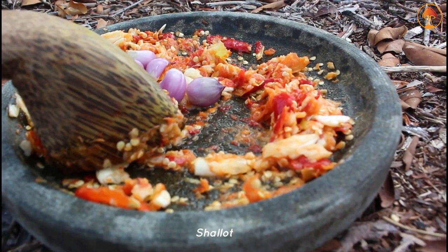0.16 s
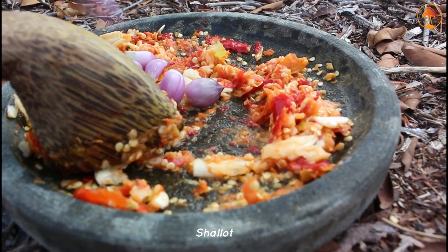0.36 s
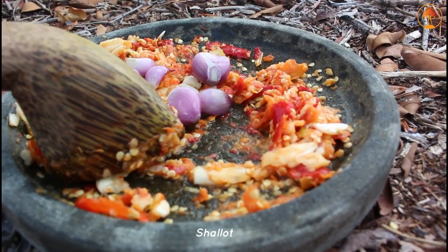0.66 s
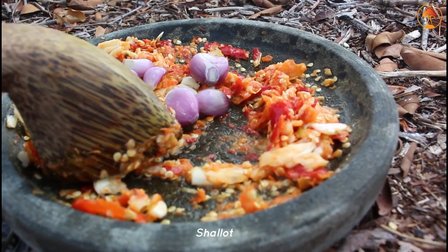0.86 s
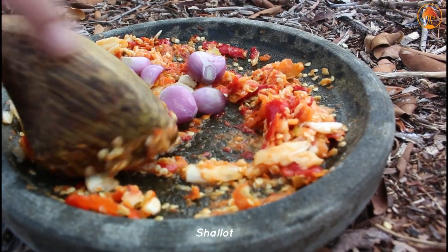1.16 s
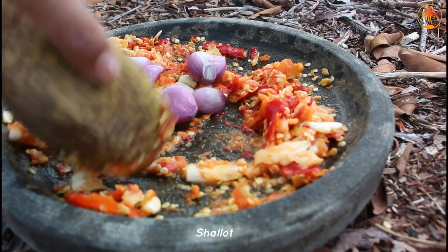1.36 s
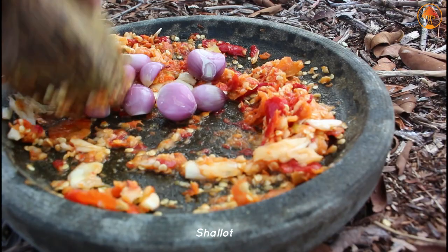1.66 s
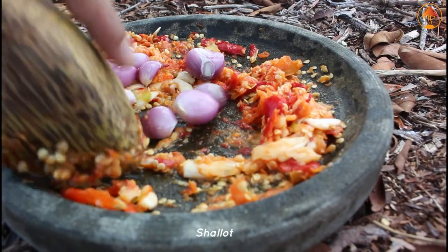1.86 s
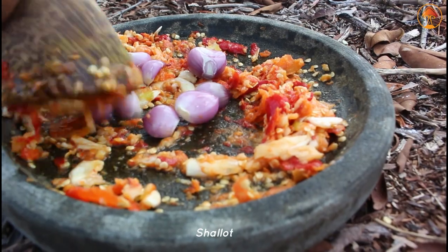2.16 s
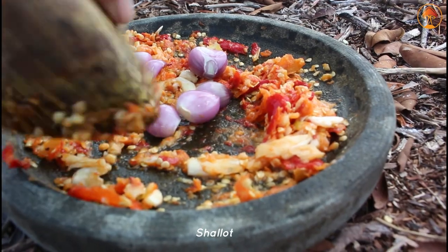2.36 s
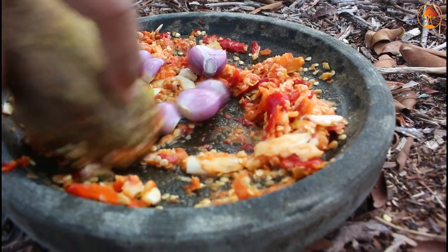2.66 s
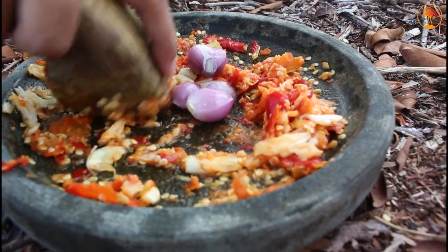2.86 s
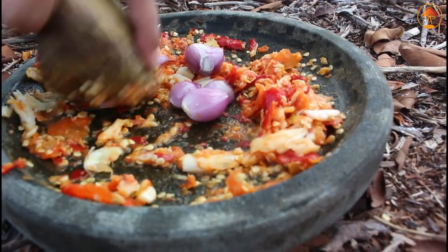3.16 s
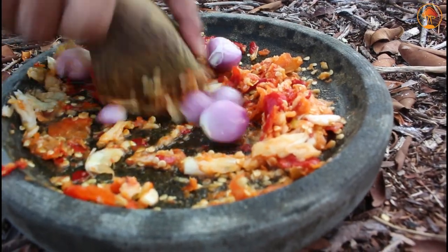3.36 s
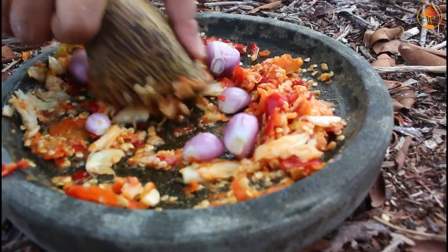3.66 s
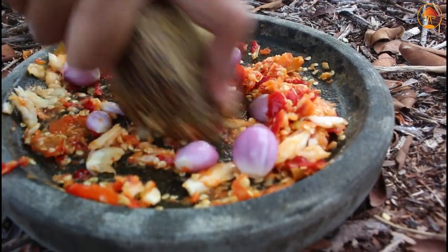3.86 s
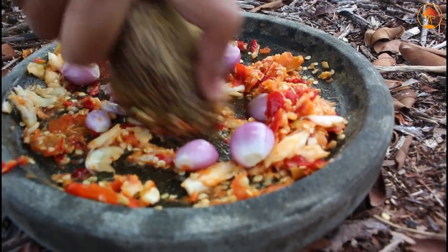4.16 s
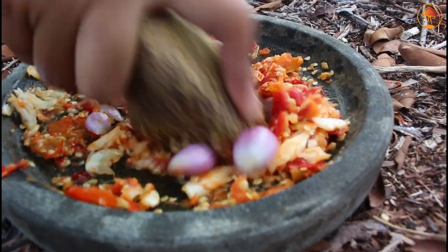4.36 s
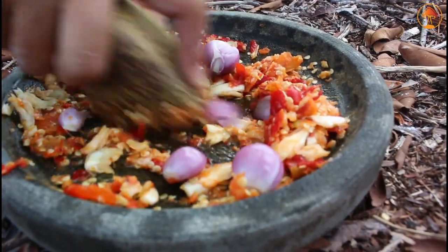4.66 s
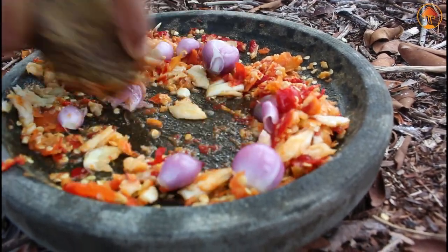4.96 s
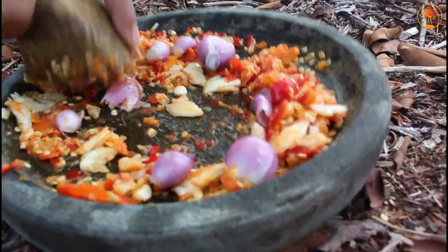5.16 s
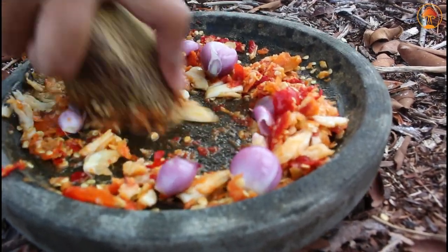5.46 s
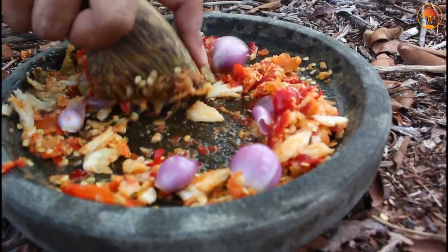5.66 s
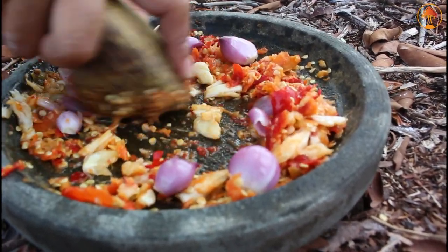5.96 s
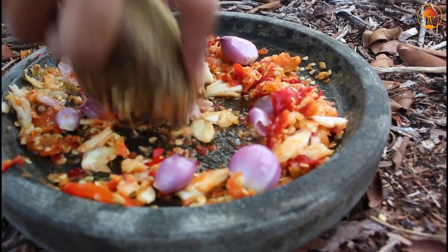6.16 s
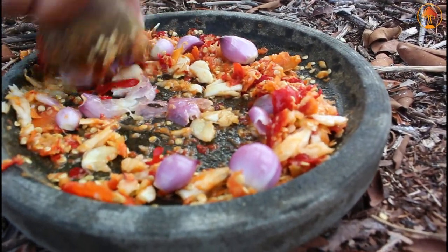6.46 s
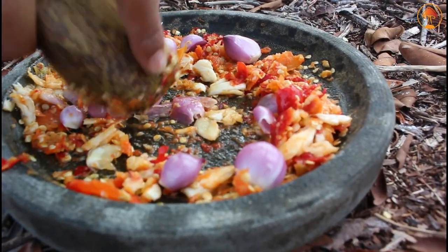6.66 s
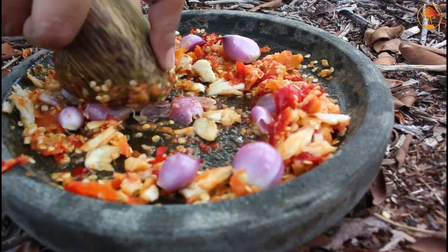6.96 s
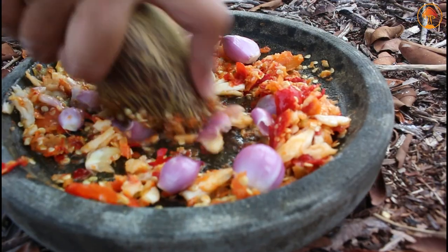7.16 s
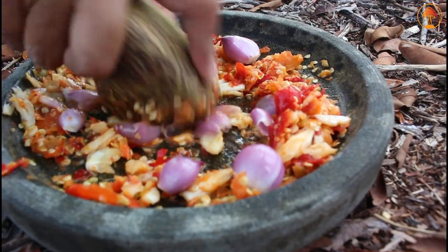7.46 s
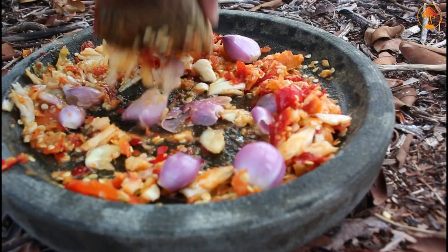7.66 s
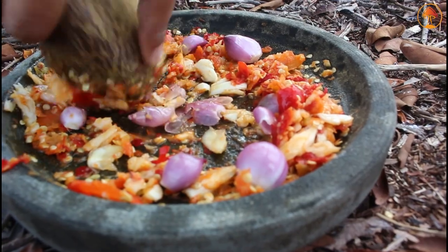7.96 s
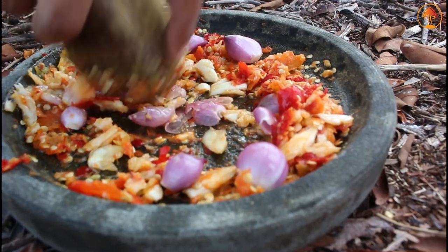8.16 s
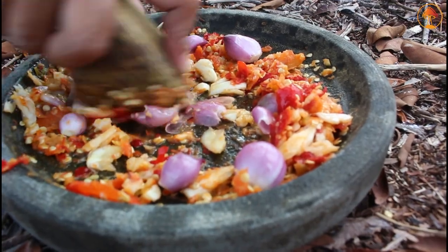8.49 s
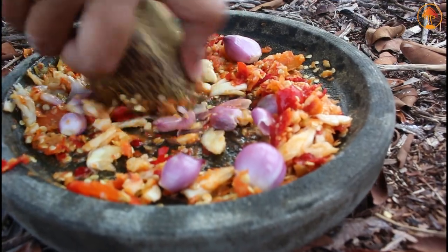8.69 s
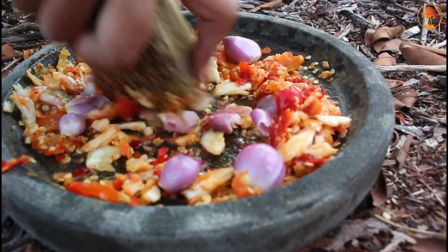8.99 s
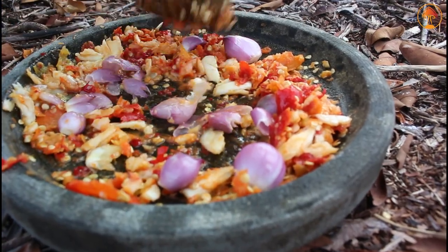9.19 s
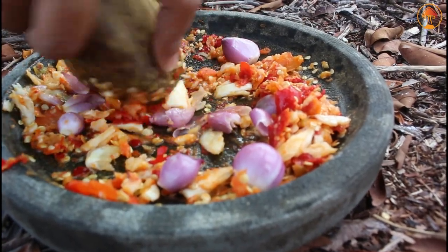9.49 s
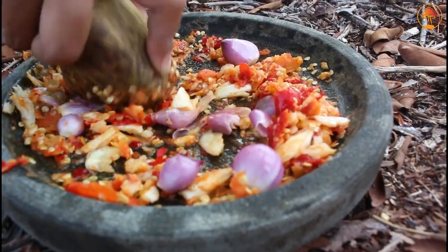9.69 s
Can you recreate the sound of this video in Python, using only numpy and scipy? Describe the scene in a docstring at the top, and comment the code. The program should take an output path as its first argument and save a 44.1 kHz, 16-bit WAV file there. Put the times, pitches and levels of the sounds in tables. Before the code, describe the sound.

A wooden pestle crushes shallots and chillies in a stone mortar, gritty wet crunches and sharp cracks close up, with faint birds and insects outdoors.

```python
"""Close up, a wooden pestle crushes shallots and chillies in a stone mortar on the forest floor.
Throughout, leaves and insects (shaped noise) lie far off; from 1.3 s soft bird whistles (gliding sines) join in.
Light presses come first; from 3.3 s the work is hard: grit noise and bursting pops crunch, wood scrapes,
skins crack and tear, knocks ring the stone's modes and low noise rumbles in the ground.
A few more whistles come after 6.3 s, the sharpest crack at 7.05 s and the last small breaks near 9.8 s."""
import sys
import numpy as np
from scipy import signal
from scipy.fft import rfft, irfft, next_fast_len
from scipy.io import wavfile
from scipy.ndimage import uniform_filter1d, map_coordinates

SR = 44100
rng = np.random.default_rng(int(sys.argv[2]) if len(sys.argv) > 2 else 0)


def linear_from_db(decibels):
    """Turn decibels (scalar or array-like) into linear amplitude factors; 0 gives 1."""
    return 10 ** (np.asarray(decibels, float) / 20)


def int16_out(signal):
    """Quantize to a 16-bit WAV file."""
    q = np.round(np.clip(np.atleast_2d(signal).T, -1, 1) * 32767)
    wavfile.write(sys.argv[1], SR, q.astype(np.int16))


N = 433503

# far rustle of leaves: (frequency [Hz], relative level per Hz [dB])
LEAVES_SPECTRUM = [(59, -38.5), (100, -2), (550, -13.5), (681, -10.5), (757, -20.5), (861, -17.5),
                   (7730, -22.5), (16300, -39.5)]
LEAVES_DB = -74.5
# insect chorus: (centre [Hz], width [Hz], relative level [dB])
INSECT_BAND = [(8340, 990, 11)]
# bird notes: (start [s], length [s], first pitch [Hz], pitch it slides towards [Hz], relative level [dB])
BIRD_NOTES = [(1.29, 0.19, 1075, 1164, -86), (1.487, 0.035, 1090, 1140, -84),
              (1.566, 0.034, 1045, 1210, -82), (1.652, 0.13, 1060, 1165, -80),
              (1.905, 0.11, 1066, 1126, -81), (2.01, .04, 1150, 1060, -82),
              (2.148, 0.067, 1076, 1120, -79.5), (2.372, 0.051, 1060, 1134, -80.5),
              (2.48, .05, 1265, 1160, -87), (2.615, 0.059, 1020, 1125, -80),
              (2.738, 0.042, 1220, 1210, -87), (2.876, 0.042, 995, 1150, -80),
              (2.988, 0.054, 1230, 1190, -86), (2.151, 0.058, 3580, 3070, -84),
              (6.385, 0.074, 3760, 3780, -84.5), (6.57, 0.087, 4780, 3900, -90),
              (6.754, 0.018, 2930, 3140, -83.5)]
GLIDE_S = 0.065  # a slide takes this long; a longer note then holds its pitch
# microphone noise: (frequency [Hz], relative level per Hz [dB])
HISS_SPECTRUM = [(35, -20), (60, -6.5), (325, -3), (451, -8.5), (6090, -10.5), (15200, -13), (16300, -19)]
# rumble of the shoved ground: (frequency [Hz], relative level per Hz [dB])
GROUND_SPECTRUM = [(15, -29), (25, 0), (57, 4), (147, -22.5), (200, -31.5), (260, -55), (440, -120)]
# deeper stir under the rumble: (frequency [Hz], relative level per Hz [dB])
STIR_SPECTRUM = [(10, -2.0), (22, 0.5), (42, -12.5), (70, -24.0), (110, -55.0)]
# shoves passed through the ground: (peak [s], level [dB], fall [s])
GROUND_SHOVES = [(1.728, -65, 0.57), (2.873, -62, 0.08), (3.324, -48.5, 0.26), (3.484, -46.5, 0.11),
                 (3.779, -52.5, 0.29), (4.011, -49.5, 0.25), (4.37, -56.5, 0.3), (4.648, -59, 0.11),
                 (5.24, -56, 0.21), (5.432, -51.5, 0.07), (5.703, -59, 0.71), (6.066, -56, 0.09),
                 (6.3, -54.5, 0.88), (7.076, -43, 0.046), (7.347, -56, .9), (7.881, -58, .3),
                 (8.5, -58.5, 0.38), (8.863, -55, 0.12), (9.275, -58, 0.091)]
SHOVE_RISE_S = 0.067
# mortar, one mode of the rim, then three of the floor: (frequency [Hz], relative level [dB], t60 [s])
STONE_MODES = [(1610, -5.5, 0.077), (3950, -1.5, 0.04), (2810, 5, 0.039), (5050, -4.5, 0.034)]
# wood meeting stone: (start [s], relative level [dB], pitch [Hz],
#                      relative solid ring [dB], relative bright ring [dB])
WOOD_KNOCKS = [(0.45, -43.5, 835, -11, -26), (1.8668, -33.5, 2020, -5, -3.5), (2.141, -53, 507, -26, -25),
               (3.295, -28, 1810, -22, -6), (3.473, -10, 914, -13.5, -7.5), (3.486, -16.5, 940, -32, -36),
               (3.9966, -29, 1500, -21, 4), (4.115, -34, 1000, -9, -16), (4.353, -33.5, 830, -4, -10),
               (4.595, -28.5, 1050, -12, -20), (5.074, -28, 810, 6, -15), (5.079, -37, 476, -19, -31),
               (5.174, -46, 1610, 5, -20), (5.225, -47, 1610, 10, -20), (5.4292, -12, 1500, -42, -34),
               (5.4434, -25.5, 1390, -36, -24), (6.841, -45, 926, -26, -34),
               (7.0507, -20.5, 1900, -5.5, -5), (7.384, -33, 980, -24, -14),
               (7.8204, -34.5, 1080, -11, -30), (7.87, -34, 1750, -25, -20),
               (7.8792, -23, 1450, -32, -24.5), (8.2502, -29, 1900, -22, -26), (8.493, -30.5, 1830, -11, 8),
               (8.869, -20, 1730, -52, -5)]
SOLID_DB, BRIGHT_DB = 41.5, 28  # lift of the blow into the rim's mode, into the floor's modes
THUMP_DB, THUMP_FOLLOWS = -6, 0.75  # thump of the pestle [dB], and its rise [dB] per dB of solid ring
# resonances of the pestle: (centre [Hz], width [Hz], relative level [dB])
PESTLE_BODY = [(470.3, 470, -7), (940, 130, 0.5), (1500, 1100, -6.5)]
# colour of the pulp's crunch: (centre [Hz], width [Hz], relative level [dB])
PULP_COLOUR = [(1500, 3200, -6), (3330, 1700, 3), (5500, 720, 3.5)]
# colour of the fizz: (frequency [Hz], relative level per Hz [dB])
FIZZ_SPECTRUM = [(3800, -12.5), (6500, -5.5), (8000, -11), (12000, -13), (15200, -15.5), (16000, -37)]
# skins ripping open: (middle [s], level [dB], length [s], fizz above the rattle [dB])
SKIN_TEARS = [(3.298, -17, 0.0053, -47), (3.4222, -32, 0.0051, -7.5), (3.4532, -33.5, 0.006, -14),
              (3.9978, -22, 0.0093, -13.5), (4.2804, -36, 0.01, -23), (4.298, -42, 0.01, -24),
              (4.363, -37.5, 0.0049, -6), (4.805, -44, .012, -20), (5.409, -36.5, 0.0063, -18),
              (5.418, -24.5, 0.0092, -23.5), (7.1927, -32.5, 0.013, -8), (7.369, -33.5, 0.0066, -25),
              (7.895, -51, .006, -25), (8.513, -28, 0.0041, -13.5), (8.7646, -37.5, .011, -19)]
# skins and seeds breaking: (start [s], relative level [dB], pitch [Hz], relative fizz [dB])
SKIN_CRACKS = [(0.4471, -38.5, 3100, -9.5), (1.0848, -43.5, 3550, -25), (1.309, -44, 2620, -28),
               (2.281, -42, 3340, -33), (2.868, -44, 3600, -19), (3.232, -30, 5500, -22.5),
               (3.29, -18, 3700, -36), (3.307, -9.5, 5500, -43), (3.3268, -25, 2880, -34.5),
               (3.3995, -23.5, 5080, -22.5), (3.471, -20.5, 2810, -9.5), (3.7226, -22, 3230, -19.5),
               (3.7296, -15, 5420, -19.5), (3.7651, -27, 2880, -25), (3.9429, -16, 3460, -28.5),
               (4.144, -24.5, 3120, -46), (4.356, -23.5, 2830, -14), (4.6378, -28.5, 3750, -20),
               (4.782, -32, 3050, -38.5), (5.236, -28, 3560, -14), (5.2762, -25, 3300, -25.5),
               (5.3083, -23, 3880, -29), (5.3537, -32, 3480, -16), (5.383, -16, 3520, -31.5),
               (5.429, -8, 3800, -26), (5.6314, -22.5, 4770, -19.5), (5.6422, -24, 2800, -22),
               (5.778, -30, 2760, -6.5), (5.8138, -29, 3770, -22), (5.9435, -27, 2070, -26.5),
               (6.093, -33, 3690, -6), (6.55, -37, 3190, -37), (7.0292, -24, 3060, -21.5),
               (7.042, -17, 2870, -26), (7.0443, -22, 2820, -24), (7.0508, 3, 3200, -38),
               (7.0657, -14.5, 3700, -36), (7.0688, -22, 3300, -30.5), (7.0714, -16, 3370, -32.5),
               (7.0746, -20.5, 3050, -33.5), (7.1183, -18, 2950, -27), (7.163, -23, 2870, -21),
               (7.1713, -28, 3200, -13.5), (7.3239, -29, 4000, -26), (7.3315, -23, 3770, -17),
               (7.3841, -17.5, 2740, -30), (7.434, -24, 3450, -18), (7.527, -36.5, 3480, -36),
               (7.8412, -44, 3300, -21), (7.8807, -25.5, 2550, -45.5), (8.4145, -30, 2950, -34.5),
               (8.4609, -21, 3150, -22), (8.4924, -6, 2660, -36.5), (8.498, -17, 2620, -30),
               (8.5276, -22, 3600, -30.5), (8.573, -19.5, 3600, -33), (8.5814, -22.5, 2360, -19.5),
               (8.6074, -24, 3600, -30.5), (8.8723, -19, 2800, -39), (8.884, -28, 3490, -14),
               (9.2698, -29.5, 2570, -19), (9.335, -25.5, 2630, -39), (9.6326, -48.5, 3800, -4),
               (9.702, -41, 2730, -25), (9.7377, -40, 2820, -27), (9.7953, -33, 3820, -26)]
# pushes of the pestle into the paste: (peak [s], crunch [dB], rise [s], fall [s], fizz above crunch [dB])
PASTE_PUSHES = [(.455, -75, .023, 0.09, -5), (1.09, -74.5, 0.015, .2, 2), (1.297, -66, .28, 0.28, -3.5),
                (1.72, -62.5, 0.026, 0.1, -6), (1.872, -67.5, 0.27, 0.02, -6), (2.279, -59, 0.13, 0.03, -7),
                (2.62, -69, 0.39, 0.45, -5.5), (2.88, -69.5, 0.25, 0.11, -12),
                (3.237, -61.5, 0.19, 0.11, 0), (3.302, -37, 0.049, 0.062, -10.5),
                (3.4, -56.5, .12, 0.093, -2.5), (3.479, -41.5, 0.21, 0.013, -5.5),
                (3.601, -48, 0.083, 0.053, -9), (3.68, -57.5, 0.15, .06, -6),
                (3.752, -37.5, 0.086, 0.078, -7.5), (3.941, -45.5, 0.089, 0.1, -7),
                (4.119, -41.5, 0.11, 0.019, -6), (4.282, -49, 0.14, 0.16, -7),
                (4.364, -41.5, 0.052, 0.11, -5.5), (4.781, -46, 0.38, 0.052, -10),
                (4.877, -55, .08, 0.027, -8), (5.168, -59.5, 0.055, 0.044, -13),
                (5.233, -40, 0.026, 0.14, -12), (5.32, -63, 0.264, 0.37, -10.5),
                (5.424, -32.5, .08, 0.08, -14.5), (5.46, -41, 0.055, 0.05, -4.5),
                (5.534, -53, .2, 0.013, -13), (5.639, -44.5, 0.043, 0.052, -7),
                (5.68, -42, 0.054, 0.013, -19), (5.725, -45.5, .02, .1, -8.5),
                (5.805, -43, 0.073, 0.032, -7.5), (5.935, -46.5, 0.057, 0.072, -10.5),
                (6.045, -36.5, 0.054, 0.081, -16), (6.095, -53.5, 0.13, 0.12, -3),
                (6.472, -50, 0.013, 0.097, -10.5), (6.539, -49.5, 0.11, 0.025, -16),
                (7.012, -62.5, 0.033, .03, -0.5), (7.05, -42.5, 0.013, 0.027, -6.5),
                (7.072, -27.5, 0.011, 0.014, -12.5), (7.12, -44.5, 0.018, 0.19, -15.5),
                (7.188, -50.5, 0.27, 0.12, -3.5), (7.327, -45.5, 0.036, .07, -8),
                (7.385, -40.5, 0.025, 0.028, -17.5), (7.523, -53, .29, 0.072, -6),
                (7.886, -46.5, 0.048, .08, -11.5), (8.325, -57, 0.02, 0.033, -8.5),
                (8.41, -57, 0.04, .06, -5), (8.518, -39, 0.06, 0.17, -13), (8.617, -46, 0.12, 0.02, -13),
                (8.752, -50, 0.22, .05, -10), (8.82, -43, 0.028, 0.062, -32), (8.88, -44, .15, 0.06, -8.5),
                (9.0, -54.5, .23, 0.064, -5), (9.274, -48.5, 0.018, 0.1, -16.5),
                (9.374, -41, 0.075, 0.043, -14), (9.44, -59, 0.06, 0.069, -14.5),
                (9.638, -56, 0.01, 0.022, -4), (9.72, -57.5, 0.073, 0.13, -8), (9.8, -62, 0.11, 0.055, -8)]
FIZZ_LASTS = 1.01  # juice fizzes over this many times the length of a push
# wood dragged over stone: (peak [s], level [dB], rise [s], fall [s])
WOOD_DRAGS = [(.78, -69.5, 0.076, 0.16), (2.4, -81, 5.2, 2.4), (3.3, -52.5, 0.027, 0.085),
              (3.483, -36.5, 0.017, 0.03), (3.732, -58.5, 0.13, 0.27), (3.912, -37.5, 0.057, 0.036),
              (4.123, -60.5, 0.3, 0.07), (4.216, -43.5, 0.045, 0.05), (4.4, -60, 0.2, 0.32),
              (4.537, -38.5, 0.051, 0.044), (4.74, -59.5, 0.29, 0.15), (5.16, -52, 0.037, 0.028),
              (5.226, -61, 0.13, 0.085), (5.436, -55, 0.039, 0.15), (5.66, -49.5, 0.053, 0.057),
              (5.78, -63.5, 0.19, 0.12), (5.91, -53.5, 0.17, 0.2), (6.6, -77, 0.44, 3.4),
              (7.057, -48, 0.025, 0.055), (7.176, -56.5, 0.11, 0.25), (7.268, -53, 0.09, 0.077),
              (8.505, -70, .075, 0.25), (8.612, -54.5, 0.14, 0.021), (8.876, -56, 0.3, .13),
              (9.359, -62.5, 0.15, 0.058), (9.83, -68, 0.28, .1)]
# bare wood catching bare stone, which sings: (peak [s], level [dB], rise [s], top mode above that [dB])
STONE_CATCHES = [(3.487, -42, 0.05, -8), (3.55, -51.5, 0.033, -8.5), (3.77, -42, 0.083, -9),
                 (3.92, -58, 0.17, 3), (4.12, -54, 0.25, 0), (4.215, -51, 0.06, -5.5),
                 (4.37, -42.5, 0.074, -12), (4.59, -60.5, 0.28, 3.5), (5.534, -56, .1, -8),
                 (5.65, -46.5, 0.035, -7.5), (5.68, -41.5, 0.05, -15), (5.79, -51, 0.11, -8.5),
                 (5.9, -61.5, 0.15, 1), (7.02, -70, .3, -12), (7.16, -48, 0.1, -12), (7.24, -53, 0.2, -12),
                 (7.39, -45, 0.039, -12.5), (9.38, -43.5, 0.073, -18)]
LETS_GO_S = 0.032  # fall after a catch
SPAN_DB = 20  # rise and fall times of a swell are for this change of level
FIRMNESS = 1.193  # 1 = pointed swells; more = flatter tops with steeper ends
HEADROOM = 0.99  # the input rounds off peaks near this value


def unit(x):
    """x at rms 1."""
    return x / np.sqrt(np.mean(x ** 2) + 1e-20)


def along(points, hz):
    """(Hz, value) points read on a log frequency axis."""
    f, value = np.transpose(points)
    return np.interp(np.log(hz + 1), np.log(f + 1), value)


def wobble(rate):
    """A smooth random curve, rate knots a second."""
    knots = rng.standard_normal(int(N * rate / SR) + 4)
    return map_coordinates(knots, [np.arange(N) * rate / SR])


def filtered(x, response):
    """x times a complex response of frequency."""
    m = next_fast_len(len(x) + 8192)
    return irfft(rfft(x, m) * response(np.fft.rfftfreq(m, 1 / SR)), m)[:len(x)]


def coloured(x, spectrum):
    """x through a (Hz, dB) spectrum, at rms 1."""
    return unit(filtered(x, lambda hz: linear_from_db(along(spectrum, hz))))


def resonant(x, peaks):
    """x through a sum of (Hz, width, dB) resonances of alternating sign."""
    def response(f):
        return sum((-1) ** k * linear_from_db(db) * 1j * f * width / (centre * centre - f * f + 1j * f * width)
                   for k, (centre, width, db) in enumerate(peaks))
    return filtered(x, response)


def swells(peak_s, db, rise_s, fall_s):
    """Gain of overlapping swells, each climbing to its peak and sinking again; their powers add."""
    t = np.arange(0, N / SR, 0.001)[:, None]
    late = t - peak_s
    away = np.where(late < 0, -late / rise_s, late / fall_s)
    power = linear_from_db(2 * (db - SPAN_DB * away ** FIRMNESS)).sum(axis=1)
    return np.interp(np.arange(N) / SR, t[:, 0], np.sqrt(power))


def forest():
    """A nearly steady far rustle of shaped noise, with a resonant band of insects."""
    leaves = coloured(rng.standard_normal(N), LEAVES_SPECTRUM)
    insects = resonant(resonant(leaves, INSECT_BAND), [(7470, 1200, 0.0075)])
    return linear_from_db(LEAVES_DB + 0.66 * wobble(2.6)) * (leaves + insects)


def bird():
    """Soft sliding whistles: sine tones, unsteady in level with distance."""
    out = np.zeros(N)
    for s, length, from_hz, towards_hz, db in BIRD_NOTES:
        u = np.linspace(0, 1, round(length * SR))
        hz = towards_hz + (from_hz - towards_hz) * np.clip(1 - u * length / GLIDE_S, 0, 1) ** 1.25
        jitter = uniform_filter1d(rng.standard_normal(len(u)), size=60)
        hz = hz * (1 + hz * 3e-5 * jitter)  # leaves blur high notes most
        envelope = np.sqrt(np.abs(np.sin(np.pi * u)))
        whistle = np.sin(2 * np.pi * np.cumsum(hz) / SR)
        out[round(s * SR):][:len(u)] += linear_from_db(db + 12.5) * envelope * whistle
    return out * linear_from_db(2.8 * wobble(30.58))


def ground():
    """Pushes on the mortar reach the microphone as lumpy rumble, over a deeper stir that grows with the work."""
    lumps = linear_from_db(1.5 * wobble(11.0)) * rng.standard_normal(N)
    deep = coloured(rng.standard_normal(N), STIR_SPECTRUM)
    s, db, fall_s = np.transpose(GROUND_SHOVES)
    rumble = swells(s, db, SHOVE_RISE_S, fall_s) * coloured(lumps, GROUND_SPECTRUM)
    stir = linear_from_db(-61.5) + linear_from_db(-22.0) * swells(s, db, 0.31, 0.49)
    return rumble + stir * linear_from_db(3.8 * wobble(5.1)) * deep


def stone(x, modes=STONE_MODES):
    """x rings the modes of the mortar; a longer t60 makes a narrower resonance."""
    return resonant(x, [(hz, np.log(1000) / (np.pi * t60), db) for hz, db, t60 in modes])


def knocks():
    """A click and a dull short note of the wood; the stone rings on after it."""
    wood, blows, t = np.zeros(N + SR), np.zeros((2, N)), np.arange(SR // 20) / SR
    for s, db, hz, solid_db, bright_db in WOOD_KNOCKS:
        fade = linear_from_db(-60 * t * hz / 8) * (1 - np.exp(-t / 0.00078))  # dies in a few cycles
        tone = 1.72 * np.sin(2 * np.pi * hz * t)
        tone += 0.27 * np.sin(2 * np.pi * 0.82 * hz * t) + 0.4 * np.sin(2 * np.pi * 2.9 * hz * t)
        # a solid contact thumps the pestle's body too
        thump_gain = linear_from_db(THUMP_DB + THUMP_FOLLOWS * solid_db - 60 * t / 0.015)
        thump = thump_gain * np.sin(2 * np.pi * 560 * t)
        click = linear_from_db(-13 - 60 * t / 0.005) * rng.standard_normal(len(t))
        wood[round(s * SR):][:len(t)] += linear_from_db(db) * (fade * tone + thump + click)
        blows[:, round(s * SR) + 40] = linear_from_db([db + solid_db + SOLID_DB, db + bright_db + BRIGHT_DB])
    rim = stone(blows[0], STONE_MODES[:1])
    floor = stone(blows[1], STONE_MODES[1:])
    return wood[:N] + rim + floor


def grit(per_s, spread_db, clump_db, bed):
    """Tiny impulses of very uneven size, coming in clumps, on a bed of noise."""
    chance, size = rng.random(N), rng.exponential(1, N)
    spikes = (chance < per_s / SR) * linear_from_db(spread_db * np.minimum(size, 4)) * rng.standard_normal(N)
    clumps = linear_from_db(clump_db * wobble(120) + clump_db / 2 * wobble(40))
    return unit(clumps * (unit(spikes) + bed * rng.standard_normal(N)))


def pops(per_s, mid_hz, octaves, cycles, spread_db):
    """Cells bursting: short wave packets, each at its own pitch and size."""
    count = int(per_s * N / SR)
    when, size = rng.random(count), rng.exponential(1, count)
    hz = np.clip(mid_hz * 2 ** (octaves * rng.standard_normal(count)), 200, 14000)[:, None]
    turns = np.arange(256) * hz / SR
    packet = turns * np.exp(-turns * 4 / cycles) * np.sin(2 * np.pi * turns)
    wave = packet * linear_from_db(spread_db * np.minimum(size, 4))[:, None]
    at = (when * N).astype(int)[:, None] + np.arange(256)
    return unit(np.bincount(at.ravel(), wave.ravel(), minlength=N)[:N])


def dulled(x, edge_hz):
    """Wet paste swallows the treble of what sounds through it."""
    return filtered(x, lambda hz: 1 / (1 + 1j * hz / edge_hz - (hz / edge_hz) ** 2) ** 2)


def patchy(x, depth_db):
    """The colour shifts from moment to moment as the paste changes under the pestle."""
    z = signal.stft(x, nperseg=256)[2]
    field = uniform_filter1d(rng.standard_normal(z.shape), 6, 0)
    field = uniform_filter1d(field, 10, 1)
    return unit(signal.istft(z * linear_from_db(depth_db * unit(field)), nperseg=256)[1][:N])


def tears():
    """Each rip is a short jagged rattle in the colour of the pulp."""
    bits = grit(per_s=4200, spread_db=-1, clump_db=-2.0, bed=0.4)
    body = dulled(resonant(bits, PULP_COLOUR), edge_hz=6100)
    spit, out = coloured(bits, FIZZ_SPECTRUM), np.zeros(N)
    for s, db, length, fizz_db in SKIN_TEARS:
        span = slice(round((s - length / 2) * SR), round((s + length / 2) * SR))
        rattle = unit(body[span]) + linear_from_db(fizz_db) * unit(spit[span])
        out[span] += linear_from_db(db) * np.hanning(span.stop - span.start) * rattle
    return out


def cracks():
    """Each break is a few cycles at its own pitch with an overtone and a spit of treble."""
    body, spit, t = np.zeros(N + SR), np.zeros(N + SR), np.arange(SR // 40) / SR
    fade = linear_from_db(-60 * t / 0.0045) * (1 - np.exp(-t / 0.0001))
    fade = fade / fade.max()
    for s, db, hz, fizz_db in SKIN_CRACKS:
        overtone = np.sin(2 * np.pi * 1.7 * hz * t + rng.uniform(0, 2.7))
        tone = np.sin(2 * np.pi * hz * t) + 0.55 * overtone
        noise = rng.standard_normal((2, len(t)))
        snap = fade * (tone + 0.51 * noise[0])
        body[round(s * SR):][:len(t)] += linear_from_db(db) * snap / np.abs(snap).max()
        spit[round(s * SR):][:len(t)] += linear_from_db(db + fizz_db + 16.0) * fade * noise[1]
    body = dulled(resonant(body[:N], [(3487, 4800, 0.0052)]), edge_hz=6920)
    return body + filtered(spit[:N], lambda hz: linear_from_db(along(FIZZ_SPECTRUM, hz)))


def grinding():
    """Grit and bursting pulp crunch and fizz; rubbing drives the wood and the stone."""
    s, db, rise_s, fall_s, fizz_db = np.transpose(PASTE_PUSHES)
    bits = grit(per_s=1600, spread_db=3.0, clump_db=3.0, bed=0.62)
    wet = pops(per_s=760, mid_hz=3700, octaves=0.5, cycles=5, spread_db=0.0)
    gritty = resonant(resonant(bits, PULP_COLOUR), [(3900, 5400, 0)])
    pulp = unit(dulled(gritty, edge_hz=5000)) + 0.5 * resonant(wet, PULP_COLOUR)
    crunch = swells(s, db, rise_s, fall_s) * patchy(pulp, depth_db=4.0)

    juice = bits + 0.24 * grit(per_s=1100, spread_db=10.0, clump_db=3.5, bed=0.21)
    fizz = patchy(coloured(juice, FIZZ_SPECTRUM), depth_db=4.0)
    fizz = swells(s, db + fizz_db, FIZZ_LASTS * rise_s, FIZZ_LASTS * fall_s) * fizz

    rub = grit(per_s=1500, spread_db=3.5, clump_db=2.8, bed=0.89)
    slips = pops(per_s=300, mid_hz=1003, octaves=0.21, cycles=4.5, spread_db=7.5)
    rubbed_wood = unit(resonant(resonant(rub, PESTLE_BODY), [(970, 1900, 0)]))
    scrape = swells(*np.transpose(WOOD_DRAGS)) * unit(rubbed_wood + 0.5 * slips)

    # the pestle's weight damps the bowl, the first two modes most
    pressed = [(hz, db - 12 * (k < 2), 0.83 * t60) for k, (hz, db, t60) in enumerate(STONE_MODES)]
    s, db, rise_s, top_db = np.transpose(STONE_CATCHES)
    singing = unit(stone(resonant(rub, [(4170, 4600, 0)]), pressed[:-1]))
    ring = swells(s, db, rise_s, LETS_GO_S) * singing
    # the top mode's share changes with the spot
    whine = swells(s, db + top_db, rise_s, 1.1 * LETS_GO_S) * unit(stone(rub, pressed[-1:]))
    return crunch + fizz + scrape + ring + whine


def scene():
    """All layers summed, the same in both channels."""
    crushing = grinding() + cracks() + tears()
    # the microphone hears a band around 4.4 kHz more weakly
    crushing = crushing - resonant(crushing, [(4410, 1100, -8.0)])
    return np.tile(crushing + knocks() + ground() + bird() + forest(), (2, 1))


def top_cut(x):
    """Nothing passes above the cut-off."""
    return signal.sosfilt(signal.butter(12, 16830, fs=SR, output="sos"), x)


def record(dry):
    """Both channels hear the same scene; each adds its own hiss and rounds off the tallest peaks."""
    hiss = np.array([coloured(noise, HISS_SPECTRUM) for noise in rng.standard_normal((2, N))])
    heard = dry + linear_from_db(-74.0) * hiss
    rounded = heard / (1 + np.abs(heard / HEADROOM) ** 10) ** (1 / 10)
    return top_cut(rounded)


dry = scene()
out = record(dry)
int16_out(out)
```